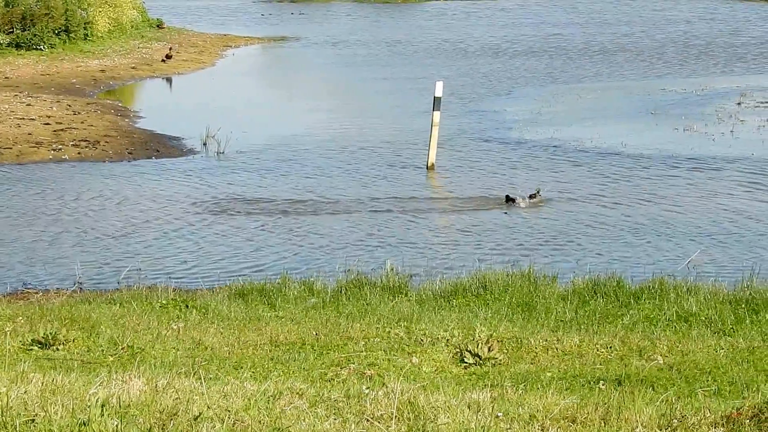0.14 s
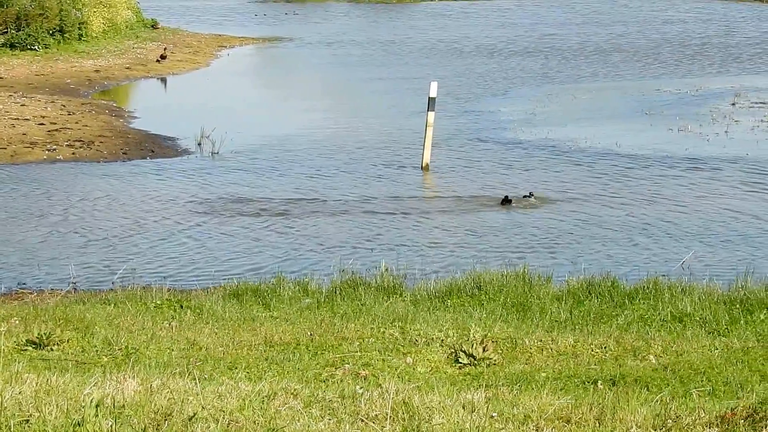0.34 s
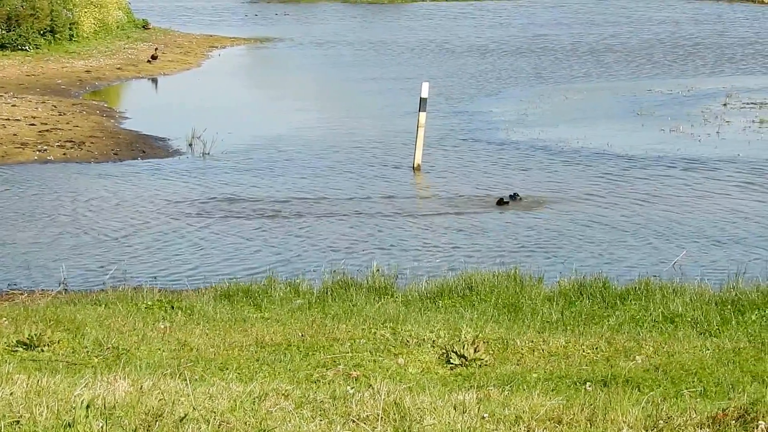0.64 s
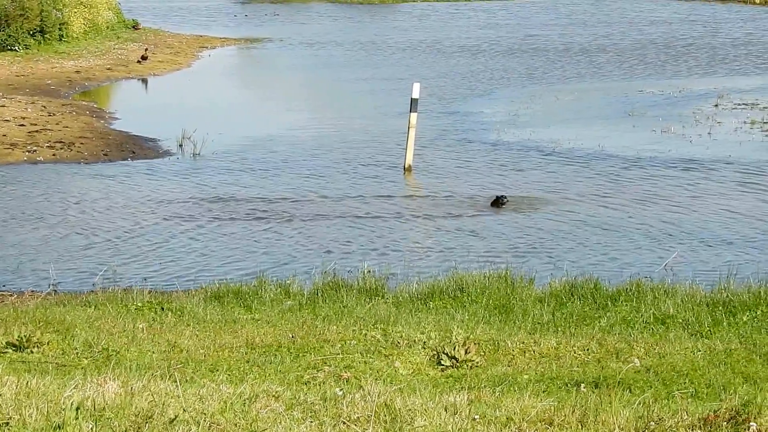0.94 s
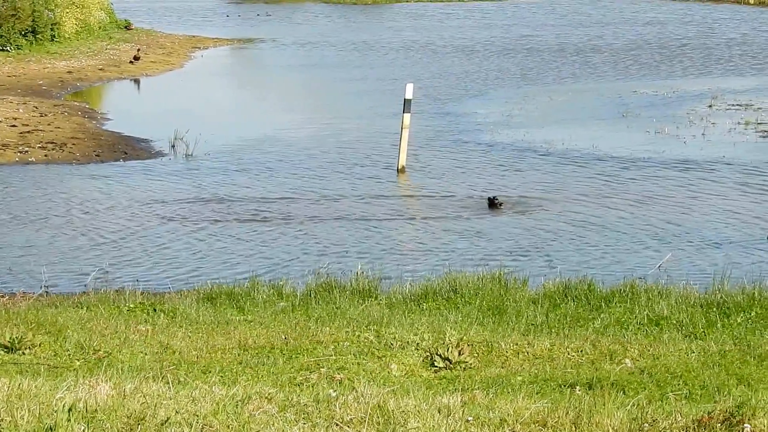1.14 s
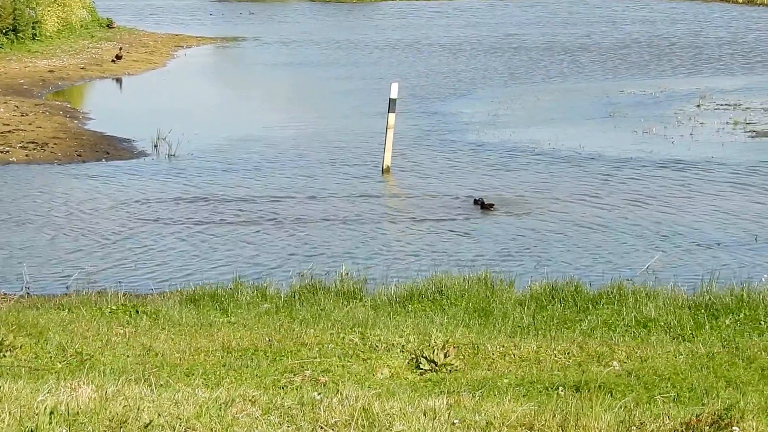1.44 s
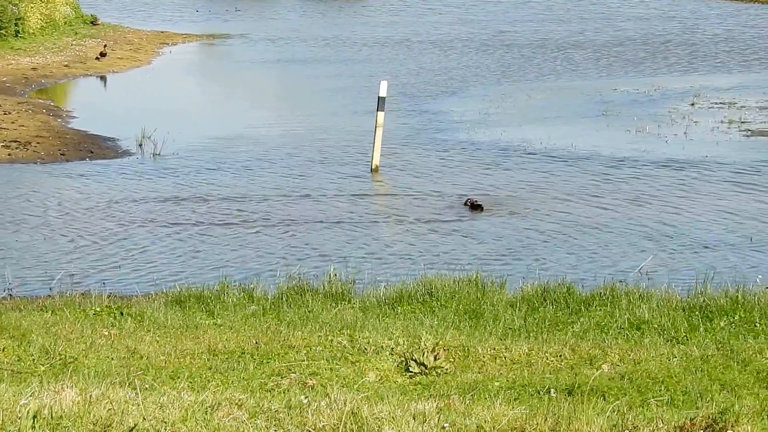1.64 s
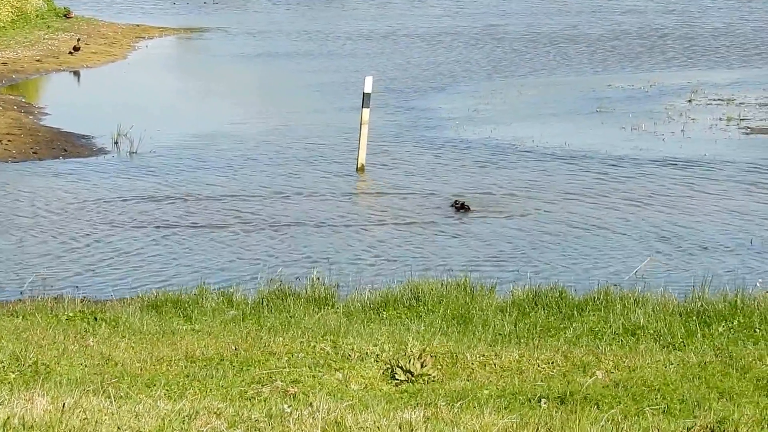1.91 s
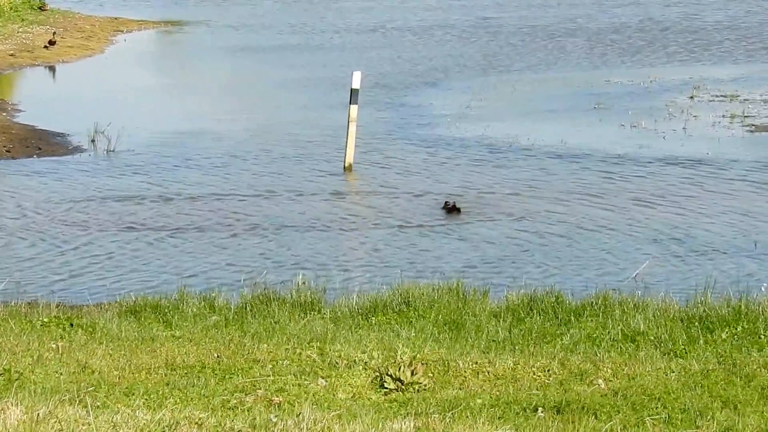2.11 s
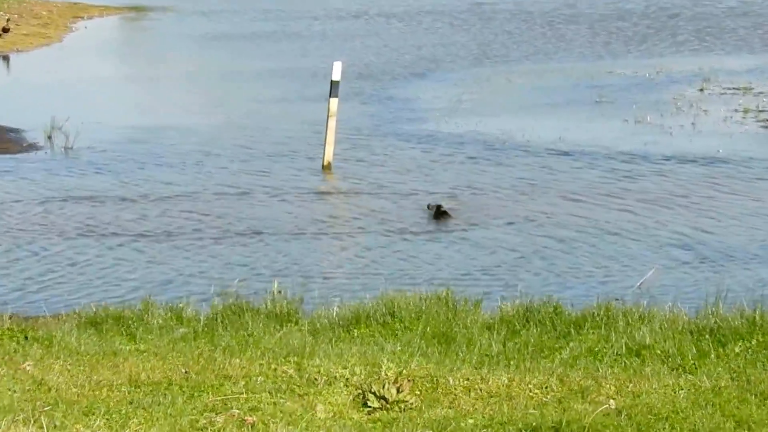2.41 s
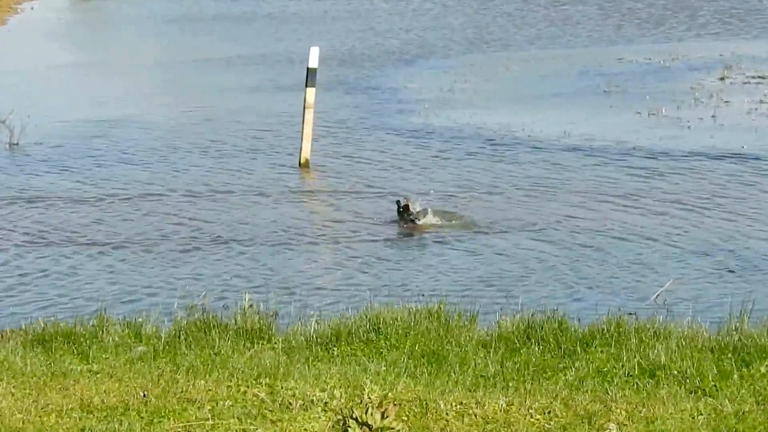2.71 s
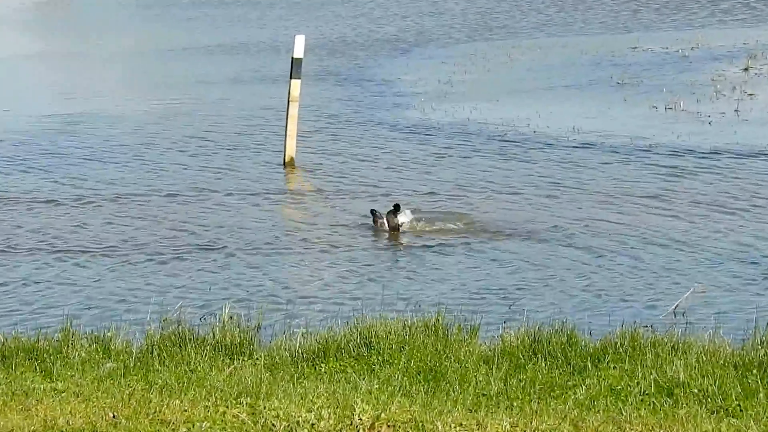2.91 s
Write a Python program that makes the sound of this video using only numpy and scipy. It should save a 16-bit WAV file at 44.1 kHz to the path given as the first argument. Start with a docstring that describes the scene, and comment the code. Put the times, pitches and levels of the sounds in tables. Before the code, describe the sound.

Splashing waterbirds pause, then plunge and thrash again amid low wind buffeting and camera whirring.

```python
"""Pond with grassy banks: two waterbirds splash, lull with two short clucks, then plunge and thrash on.
Water is random bubbles and spray noise, plus ringing air pockets and short noise slaps.
One falling yelp (harmonic tone) and a twittering songbird (glides, a trill); sparse echoes off the banks.
Wind is resonant noise in a camera body, buffeting rumble and a rush through grass, over steady hiss.
The camera's zoom motor whirrs twice: pulsed noise through lens-barrel resonances."""
import sys
import numpy as np
from scipy import signal
from scipy.fft import rfft, irfft
from scipy.io import wavfile
from scipy.ndimage import uniform_filter1d

SR = 44100
rng = np.random.default_rng(int(sys.argv[2]) if len(sys.argv) > 2 else 0)


def unload_audio(sound):
    """Save the sound as a 16-bit wav file, at the path given as the first command line argument."""
    columns = np.transpose(np.atleast_2d(sound))
    # keep every value between -1 and 1, then stretch to whole-number steps
    steps = np.round(np.clip(columns, -1, 1) * 32767)
    wavfile.write(sys.argv[1], SR, steps.astype(np.int16))


N = 134946
TIME_S = np.arange(N) / SR
FREQS_HZ = np.maximum(np.arange(N // 2 + 1) * SR / N, 1)

# Wind strength. Each row: time in seconds, drone level in dB before DRONE_TRIM_DB.
GUST_DB = [(0.0, -41.5), (0.02, -34), (0.3, -41.5), (0.31, -45.5), (0.54, -38.5), (0.56, -45.5),
           (0.73, -33), (0.93, -44), (0.96, -37), (1.06, -47.5), (1.11, -35.5), (1.2, -43), (1.23, -29.5),
           (1.37, -39), (1.4, -34), (1.51, -42.5), (1.61, -39), (1.87, -42.5), (1.98, -32), (2.14, -43.5),
           (2.22, -39), (2.27, -50), (2.3, -38), (2.53, -45), (2.55, -38), (2.78, -43), (2.93, -31.5),
           (2.97, -44.5), (3.01, -33.5), (3.06, -42)]
# Hollow resonances of the camera body. Each row: centre in Hz, width in Hz, relative level in dB.
BODY_MODES = [(205.16, 10.1, 0), (178.3, 14, -4.5)]
DRONE_TRIM_DB, DRONE_EVEN_S, DRONE_SIDE_DB = 0.73, 0.06, -27
# Buffeting spectrum at mean wind. Each row: frequency in Hz, density in dB per Hz.
RUMBLE_DENSITY = [(20, -80), (40, -84), (66, -65), (92, -71.5), (118, -68.5), (150, -67), (240, -76),
                  (280, -71.5), (345, -82), (430, -102), (1000, -100), (4000, -135)]
RUMBLE_SMOOTH_S, RUMBLE_DB_PER_GUST_DB, RUMBLE_SIDE_DB = 0.17, 0.72, -20
# Wind rush through grass, peaking with the strongest gust. Each row: time in seconds, gain in dB.
RUSH_DB = [(.6, -17.5), (.78, -9.5), (1.05, -7.5), (1.22, 1), (1.33, -10), (1.48, -9)]
# Rush spectrum before that gain. Each row: frequency in Hz, density in dB per Hz.
RUSH_DENSITY = [(100, -101), (260, -64.5), (340, -69), (450, -85.5), (1200, -93), (2200, -100),
                (6000, -105), (12000, -130)]
# Steady air and hiss. Each row: frequency in Hz, common density in dB per Hz,
# left-right difference density in dB per Hz.
AIR_DENSITY = [(204, -92.5, -91), (590, -88, -96), (960, -90, -98.5), (1890, -95, -100), (3450, -96, -100),
               (4070, -97.5, -102), (4400, -93.5, -97), (6450, -89.5, -89.5), (7360, -98.5, -95.5),
               (7770, -102, -103), (9960, -109, -109), (14700, -116, -116)]

# Vigour, one list per bout. Each row: time in seconds, gain in dB.
THRASH_BOUTS = [
    [(0, 2), (.03, 0), (.06, -3), (.11, -2.5), (.19, -4), (.29, -3), (.335, -11), (.44, -24)],
    [(2.4, -34), (2.41, -2.5), (2.55, -11.5), (2.61, -0.5), (2.73, 1), (2.84, 2), (2.9, -3), (3.02, -4),
     (3.06, 1)],
]
# Fine spray before vigour. Each row: frequency in Hz, density in dB per Hz.
SPRAY_DENSITY = [(200, -118), (500, -88.5), (1100, -84.5), (2200, -91.5), (5500, -88), (7500, -100),
                 (10000, -108), (15500, -120)]
# Bubbles and drops. Each row: pitch in Hz, relative level in dB.
BUBBLE_LEVELS = [(400, -2), (750, -1), (1200, 3), (1900, 1), (3000, 4.5), (4000, -3.5), (5500, 1),
                 (7000, 1), (9000, -57)]
BUBBLES_PER_S, BUBBLE_CYCLES, BUBBLE_SPREAD_DB = 1700, 30, 2.5
BUBBLE_RISE_SHARE = 0.17  # pitch climb over a bubble's life
BUBBLES_RMS_DB = -48  # before vigour
# Air pockets closing. Each row: time in seconds, level in dB before attack and decay, pitch in Hz,
# 60 dB decay time in seconds.
PLUNKS = [(2.406, -19.5, 308, 0.036), (2.4045, -40, 524, .03), (2.405, -38, 1332, 0.033),
          (2.427, -29, 257.6, 0.14), (2.433, -35, 473, 0.064), (2.456, -39, 595, 0.023),
          (2.488, -32, 970, 0.012), (0.016, -37.5, 390, 0.059), (.075, -36.5, 790, 0.034),
          (.084, -32.5, 940, 0.027), (.098, -36, 780, 0.027), (.11, -34, 860, .025),
          (0.119, -35.5, 1570, 0.018), (0.132, -33, 1290, 0.018), (.298, -37.5, 1577, .03),
          (2.609, -34, 1400, 0.018), (2.672, -31, 1340, 0.018), (2.708, -32.5, 3040, 0.032)]
PLUNK_ATTACK_S = 0.00096
# Sharp slaps of water. Each row: time in seconds, level in dB before SLAP_TRIM_DB, ring in Hz.
SLAPS = [(.017, -34, 4540), (0.044, -34, 4200), (0.1, -40.5, 4330), (.182, -40, 5000), (.237, -46, 5600),
         (.295, -41, 4300), (2.565, -34, 5860), (2.725, -32.5, 4650), (2.754, -30, 5270),
         (2.801, -25, 5230), (2.827, -35, 5860), (2.94, -34, 6400), (2.954, -29, 5400), (3.001, -38, 4700),
         (3.036, -23, 5000)]
SLAP_DECAY_S, SLAP_WIDTH_HZ, SLAP_TRIM_DB = 0.0012, 1660, -4

# Falling yelp. Each row: time in seconds, length in seconds, start pitch in Hz, end pitch in Hz.
YELPS = [(0.435, .064, 2210, 1830)]
# Yelp harmonics from the fundamental up. Each entry: level in dB.
YELP_HARMONICS_DB = [-46.5, -47, -61]
YELP_EDGE_SHARE = 0.28
YELP_ECHO_DB, YELP_ECHO_T60_S, YELP_ECHO_CUT_HZ = -3, 0.38, 3100
# Songbird glides. Each row: time in seconds, length in seconds, start pitch in Hz, end pitch in Hz,
# level in dB before flutter.
SONG_NOTES = [(0.808, .016, 6220, 5760, -57), (1.006, 0.01, 4840, 4190, -45),
              (1.173, 0.0087, 4770, 4380, -47), (1.419, 0.0067, 6050, 4840, -41.5),
              (1.496, 0.014, 6440, 4540, -46), (1.574, 0.015, 6730, 4750, -46.5),
              (1.603, 0.0099, 6300, 6900, -43), (1.618, 0.0096, 5980, 6900, -44),
              (1.634, .009, 6200, 6900, -44), (1.646, 0.0095, 6140, 6870, -48.5),
              (1.66, 0.012, 6340, 6800, -46.5), (1.683, 0.0041, 7300, 5000, -39),
              (1.732, 0.015, 5170, 5950, -51), (1.879, 0.014, 6900, 5100, -48),
              (1.935, 0.026, 3950, 4470, -49.5), (1.954, .034, 3950, 3610, -49),
              (2.036, 0.036, 5150, 5155, -53), (2.063, 0.029, 5130, 5200, -43),
              (2.235, 0.011, 7660, 6860, -42.5), (2.271, 0.013, 7150, 6300, -42.5),
              (2.312, 0.015, 7100, 6440, -48), (2.36, 0.02, 6800, 6640, -48.5)]
# Songbird trills. Each row: time in seconds, length in seconds, mean pitch in Hz,
# level in dB before pulsing and flutter.
TRILLS = [(1.708, 0.13, 4370, -53.5)]
TRILL_SWING_HZ, TRILL_RATE_HZ, TRILL_PULSE_DEPTH, SONG_FLUTTER_RMS = 200, 76, 0.45, 0.3

# Zoom motor runs. Each row: start in seconds, end in seconds, gain in dB.
ZOOM_RUNS = [(1.932, 2.227, -2), (2.464, 3.1, -1)]
ZOOM_RAMP_S, GEAR_HZ, GEAR_DEPTH = 0.031, 152.6, 0.15
# Lens barrel resonances before run gain. Each row: centre in Hz, width in Hz,
# common density in dB per Hz, left-right difference density in dB per Hz.
BARREL_MODES = [(1073, 195, -77, -95), (1810, 300, -92, -106), (2490, 210, -85, -90), (3080, 230, -91, -92),
                (3730, 200, -97, -96), (4550, 400, -85, -97), (5700, 520, -83.5, -82),
                (6430, 340, -82, -82), (7070, 370, -85.5, -82), (8220, 200, -100.5, -95)]
# Thin motor whines before run gain. Each row: centre in Hz, width in Hz, density in dB per Hz.
WHINE_MODES = [(1097, 31, -72), (2506, 47, -79), (6450, 27, -72), (7260, 76, -83.5)]
# Waterbird clucks. Each row: time in seconds, length in seconds, pitch in Hz, level in dB.
CLUCKS = [(2.031, 0.0091, 1005, -38), (2.248, 0.015, 1077, -40.5)]
# rms pitch jitter as a share of pitch
YELP_JITTER, SONG_JITTER, TRILL_JITTER, CLUCK_JITTER = 0.019, 0.006, 0.025, 0.13
POND_ECHO_DB, POND_ECHO_T60_S, POND_ECHO_CUT_HZ = -7.5, 0.15, 12500
CUTOFF_HZ = 15750


def from_db(db):
    """Decibels to amplitude gain."""
    return 10 ** (np.asarray(db) / 20)


def rms_one(x):
    """Scale to unit rms."""
    return x / np.sqrt(np.mean(x ** 2) + 1e-20)


def at_hz(points, hz, column=1):
    """Interpolate one table column over log frequency."""
    points = np.array(points)
    return np.interp(np.log(hz), np.log(points[:, 0]), points[:, column])


def at_time(points):
    """Interpolate a (seconds, dB) table over the scene."""
    return np.interp(TIME_S, *np.transpose(points))


def noise(gain):
    """Gaussian noise with the given amplitude per root hertz."""
    return irfft(rfft(rng.standard_normal(N)) * gain, N) * np.sqrt(SR / 2)


def coloured_noise(density, column=1):
    """Noise with a tabulated dB-per-Hz spectrum."""
    return noise(from_db(at_hz(density, FREQS_HZ, column)))


def resonance(hz, width_hz):
    """Steep-skirted resonance: squared magnitude of a single resonator's response, scaled in width."""
    return 1 / (1 + ((FREQS_HZ ** 2 - hz ** 2) / (FREQS_HZ * width_hz * np.sqrt(2))) ** 2)


def stereo(mid, side):
    """Left and right from common part and difference."""
    return np.array([mid + side, mid - side])


def add(out, start_s, sound):
    """Mix a sound in at a time."""
    i = max(int(start_s * SR), 0)
    out[i:i + len(sound)] += sound[:max(N - i, 0)]


def bird_tone(path_hz, levels_db, jitter_share, edge_share=0.44):
    """Harmonics on a jittered pitch path; edge_share is the part spent fading in and out."""
    jitter = rms_one(uniform_filter1d(rng.standard_normal(N // 8), size=30))[:len(path_hz)]
    phase = 2 * np.pi * np.cumsum(path_hz * (1 + jitter_share * jitter)) / SR
    tone = sum(from_db(db) * np.sin((k + 1) * phase) for k, db in enumerate(levels_db))
    return signal.windows.tukey(len(path_hz), edge_share) * tone


def banks(x, t60_s, cut_hz):
    """Bank scatter: sparse decaying random echoes, low-passed, different on each side."""
    t = TIME_S[:SR // 2]
    shape = (2, len(t))
    present = rng.random(shape) < 0.02
    echoes = rng.standard_normal(shape) * present * from_db(-60 * t / t60_s)
    echoes /= np.sqrt(np.sum(echoes ** 2, axis=1, keepdims=True))
    echoes = signal.sosfilt(signal.butter(2, cut_hz, fs=SR, output="sos"), echoes)
    return signal.fftconvolve(x[None], echoes, axes=1)[:, :N]


def wind():
    """Gusts excite the hollow camera body, buffet it with rumble and rush through grass."""
    gust_db = at_time(GUST_DB)
    body = sum(from_db(db) * resonance(hz, width_hz) for hz, width_hz, db in BODY_MODES)
    drone = noise(body)
    # even out the noise's own level so the gust table sets it
    drone = drone / np.sqrt(uniform_filter1d(drone ** 2, int(DRONE_EVEN_S * SR)) + 1e-12)
    drone = stereo(drone, from_db(DRONE_SIDE_DB) * rms_one(noise(body)))

    rumble_side = from_db(RUMBLE_SIDE_DB) * coloured_noise(RUMBLE_DENSITY)
    rumble = stereo(coloured_noise(RUMBLE_DENSITY), rumble_side)
    slow_gust_db = uniform_filter1d(gust_db - gust_db.mean(), int(RUMBLE_SMOOTH_S * SR))
    swell_db = RUMBLE_DB_PER_GUST_DB * slow_gust_db

    rush = from_db(at_time(RUSH_DB)) * coloured_noise(RUSH_DENSITY)
    return from_db(gust_db + DRONE_TRIM_DB) * drone + from_db(swell_db) * rumble + rush


def air():
    """Steady outdoor hiss: independent common and difference noise."""
    return stereo(coloured_noise(AIR_DENSITY), coloured_noise(AIR_DENSITY, column=2))


def bubbles():
    """Random bubbles, each ringing for the same cycle count with rising pitch; unit rms."""
    out = np.zeros(N)
    for when, size, luck in rng.random((int(BUBBLES_PER_S * N / SR), 3)):
        hz = (20 + 72 * size) ** 2
        life_s = BUBBLE_CYCLES / hz  # 60 dB decay
        t = TIME_S[:int(life_s * SR)]
        # 5 log10 evens out energy per octave; luck makes a few bubbles loud
        db = at_hz(BUBBLE_LEVELS, hz) + 5 * np.log10(hz)
        db -= BUBBLE_SPREAD_DB * np.log(max(1 - luck, 0.02))
        cycles = hz * t * (1 + BUBBLE_RISE_SHARE * t / life_s / 2)
        add(out, when * N / SR, from_db(db - 60 * t / life_s) * np.sin(2 * np.pi * cycles))
    return rms_one(out)


def thrashing():
    """Wings and feet churn water into bubbles and spray, both scaled by vigour."""
    vigour = 0
    for bout in THRASH_BOUTS:
        bout_db = np.interp(TIME_S, *np.transpose(bout), left=-90, right=-90)
        vigour = vigour + from_db(bout_db)
    return vigour * (coloured_noise(SPRAY_DENSITY) + from_db(BUBBLES_RMS_DB) * bubbles())


def plunks():
    """Air pockets left by plunging bodies ring as decaying sines."""
    out, t = np.zeros(N), TIME_S[:SR // 5]
    attack = 1 - np.exp(-t / PLUNK_ATTACK_S)
    for start_s, db, hz, t60_s in PLUNKS:
        add(out, start_s, from_db(db - 60 * t / t60_s) * attack * np.sin(2 * np.pi * hz * t))
    return out


def slaps():
    """Thrown water lands: a very short noise burst through two equal resonators."""
    out, t = np.zeros(N), TIME_S[:SR // 40]
    radius = np.exp(-np.pi * SLAP_WIDTH_HZ / SR)
    for start_s, db, hz in SLAPS:
        poles = [1, -2 * radius * np.cos(2 * np.pi * hz / SR), radius ** 2]
        burst = rng.standard_normal(len(t)) * np.exp(-t / SLAP_DECAY_S)
        for _ in range(2):
            burst = signal.lfilter([1, 0, -1], poles, burst)
        burst /= np.sqrt(np.sum(burst ** 2) / (SLAP_DECAY_S * SR))
        add(out, start_s, from_db(db + SLAP_TRIM_DB) * burst)
    return out


def yelp():
    """One falling call from farther away, strong in its first two harmonics."""
    out = np.zeros(N)
    for start_s, length_s, start_hz, end_hz in YELPS:
        path_hz = np.linspace(start_hz, end_hz, int(length_s * SR))
        add(out, start_s, bird_tone(path_hz, YELP_HARMONICS_DB, YELP_JITTER, YELP_EDGE_SHARE))
    return out


def songbird():
    """Quick fluttering glides and a trill, loudest as its pitch swings up."""
    out = np.zeros(N)
    for start_s, length_s, start_hz, end_hz, db in SONG_NOTES:
        path_hz = np.linspace(start_hz, end_hz, int(length_s * SR))
        add(out, start_s, bird_tone(path_hz, [db], SONG_JITTER))
    for start_s, length_s, hz, db in TRILLS:
        swing = 2 * np.pi * TRILL_RATE_HZ * TIME_S[:int(length_s * SR)]
        pulse = 1 + TRILL_PULSE_DEPTH * np.cos(swing)
        tone = bird_tone(hz + TRILL_SWING_HZ * np.sin(swing), [db], TRILL_JITTER)
        add(out, start_s, pulse * tone)
    flutter = rms_one(uniform_filter1d(rng.standard_normal(N), size=150))
    return out * (1 + SONG_FLUTTER_RMS * flutter)


def zoom_motor():
    """Gear friction, pulsing at the gear rate, rings the lens barrel and whines."""
    running = 0
    for start_s, end_s, db in ZOOM_RUNS:
        inside_s = np.minimum(TIME_S - start_s, end_s - TIME_S)
        running = running + from_db(db) * np.clip(inside_s / ZOOM_RAMP_S + 0.5, 0, 1)
    mid = noise(sum(from_db(db) * resonance(hz, width_hz) for hz, width_hz, db, _ in BARREL_MODES))
    side = noise(sum(from_db(db) * resonance(hz, width_hz) for hz, width_hz, _, db in BARREL_MODES))
    whine = noise(sum(from_db(db) * resonance(hz, width_hz) for hz, width_hz, db in WHINE_MODES))
    gear = 1 + GEAR_DEPTH * np.sin(2 * np.pi * GEAR_HZ * TIME_S)
    return running * gear * stereo(mid + whine, side)


def clucks():
    """Very short notes from the scuffling birds, roughened by strong pitch jitter."""
    out = np.zeros(N)
    for start_s, length_s, hz, db in CLUCKS:
        add(out, start_s, bird_tone(np.full(int(length_s * SR), hz), [db], CLUCK_JITTER))
    return out


def scene():
    """Wind, hiss and motor in stereo; pond and birds central, with echoes to both sides."""
    near = wind() + air() + zoom_motor()
    pond = thrashing() + plunks() + slaps() + songbird() + clucks()
    far = yelp()
    far_echo = from_db(YELP_ECHO_DB) * banks(far, YELP_ECHO_T60_S, YELP_ECHO_CUT_HZ)
    pond_echo = from_db(POND_ECHO_DB) * banks(pond, POND_ECHO_T60_S, POND_ECHO_CUT_HZ)
    return near + far + pond + far_echo + pond_echo


def record(dry):
    """Steep elliptic low-pass at CUTOFF_HZ."""
    return signal.sosfilt(signal.ellip(12, 0.1, 80, CUTOFF_HZ, fs=SR, output="sos"), dry)


dry = scene()
out = record(dry)
unload_audio(out)
```